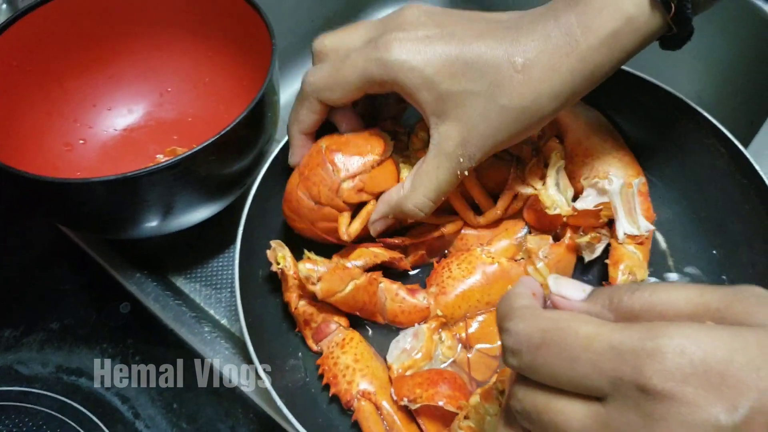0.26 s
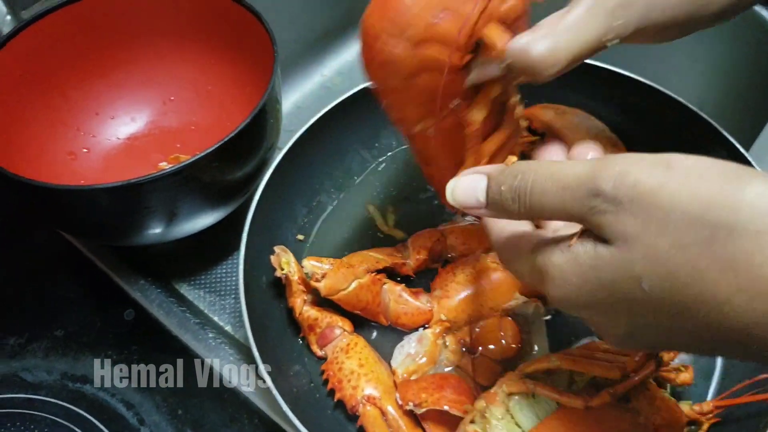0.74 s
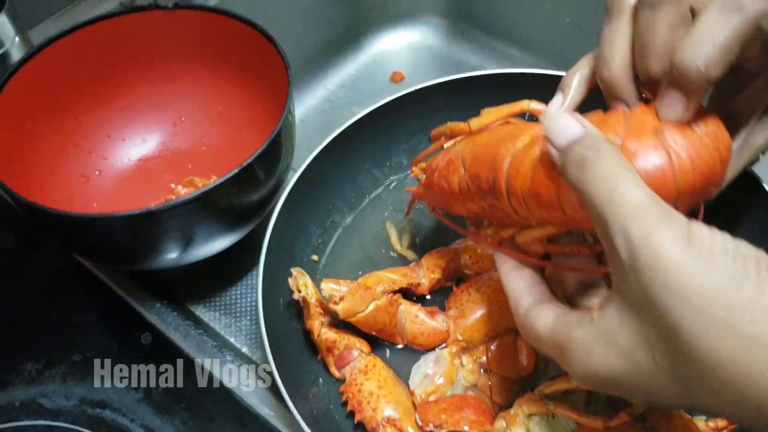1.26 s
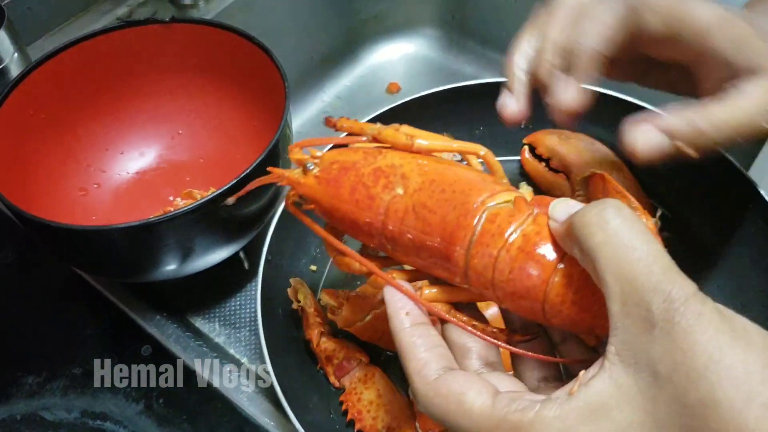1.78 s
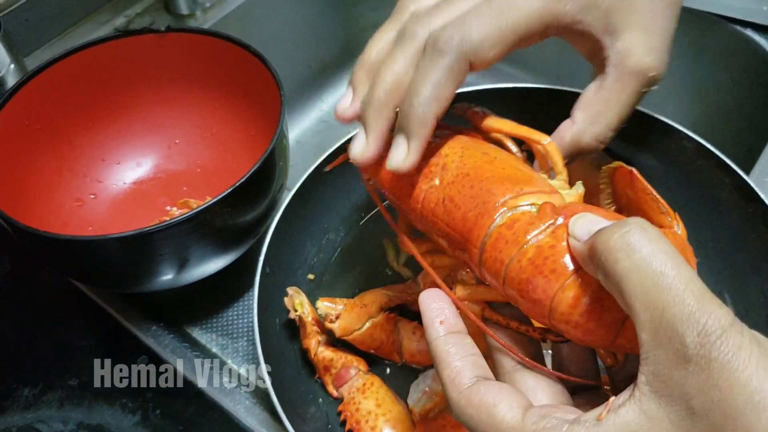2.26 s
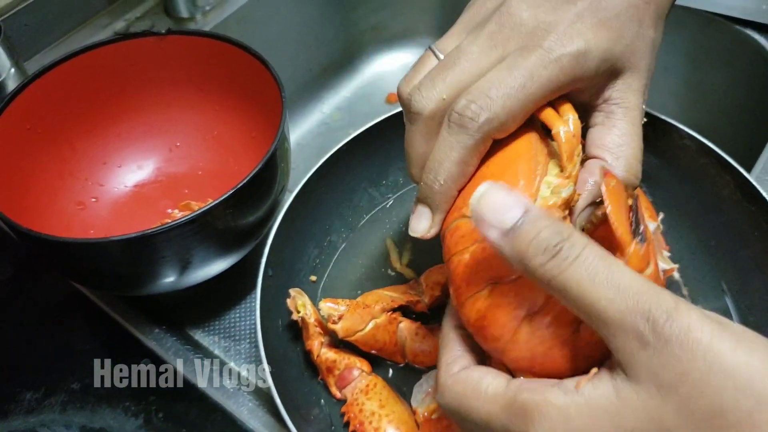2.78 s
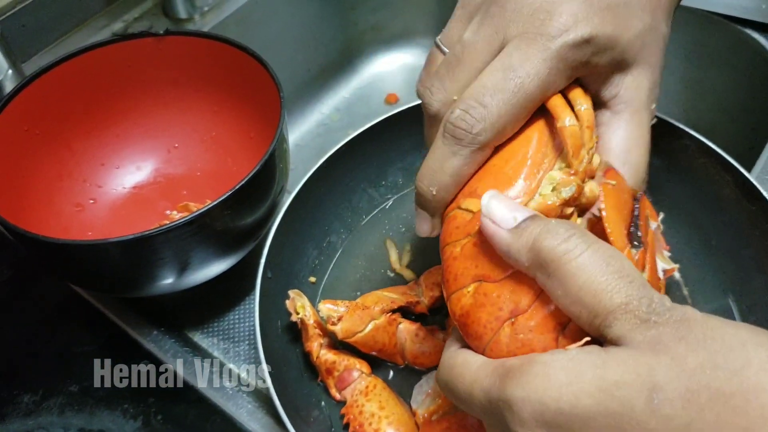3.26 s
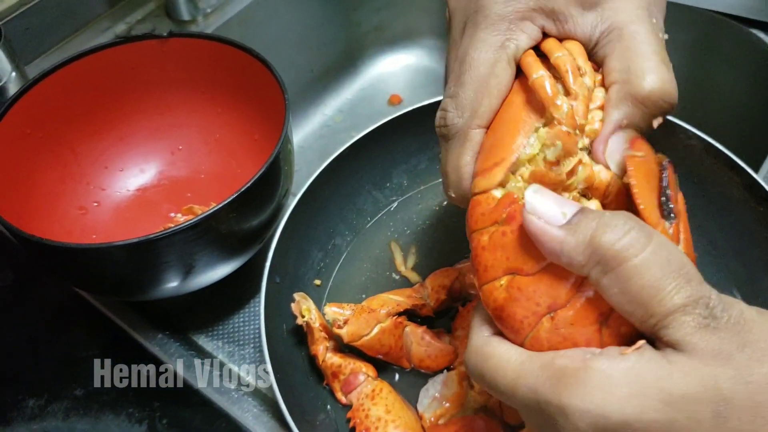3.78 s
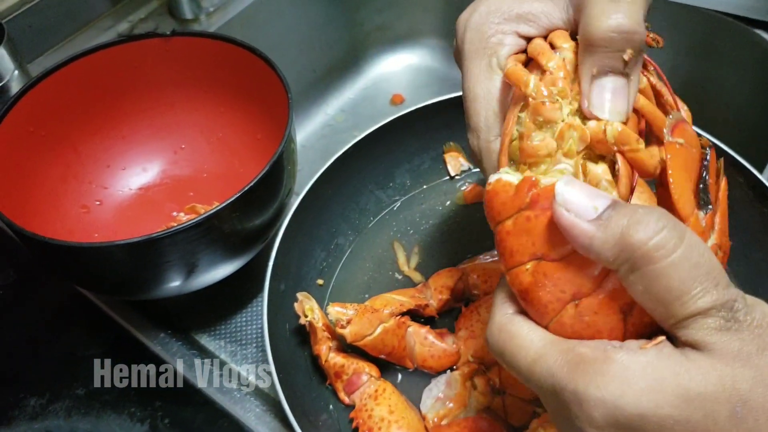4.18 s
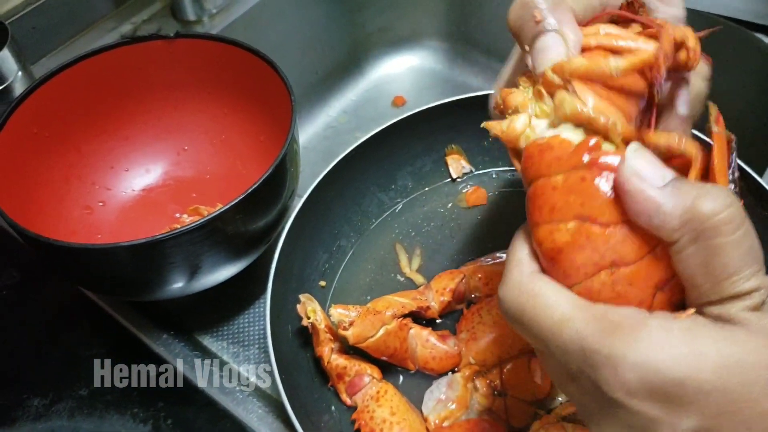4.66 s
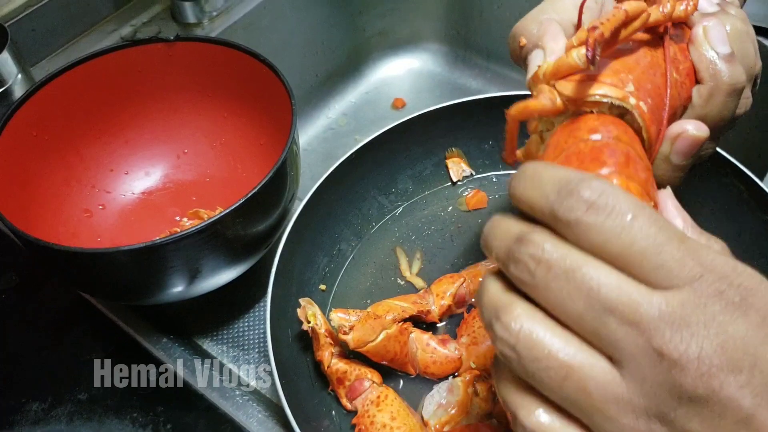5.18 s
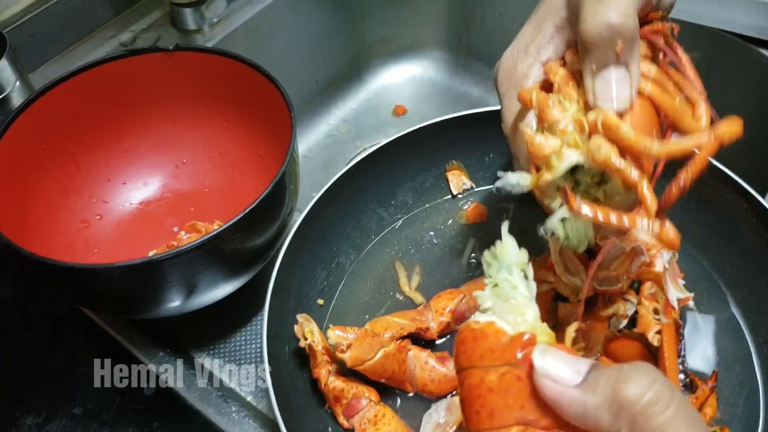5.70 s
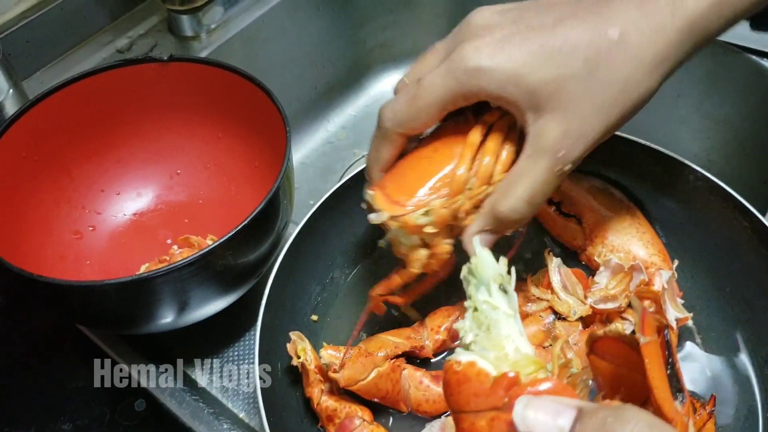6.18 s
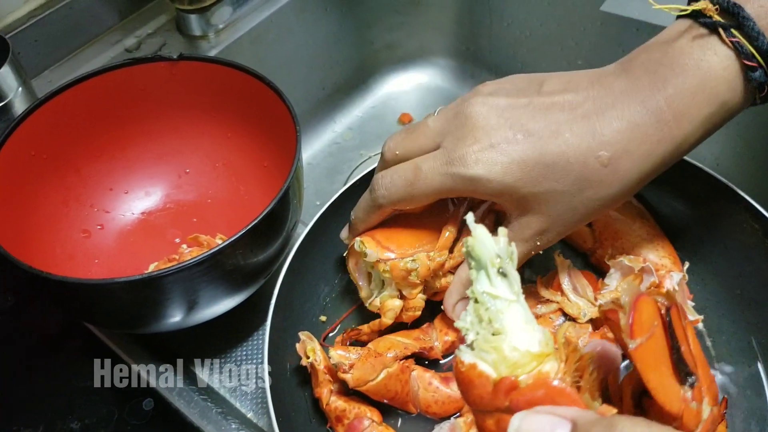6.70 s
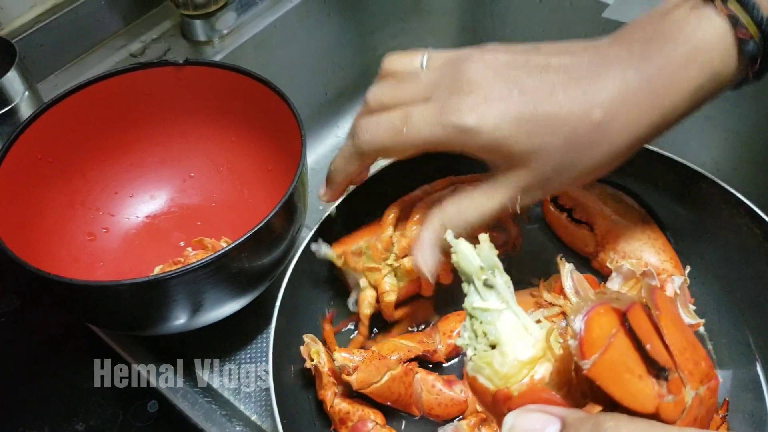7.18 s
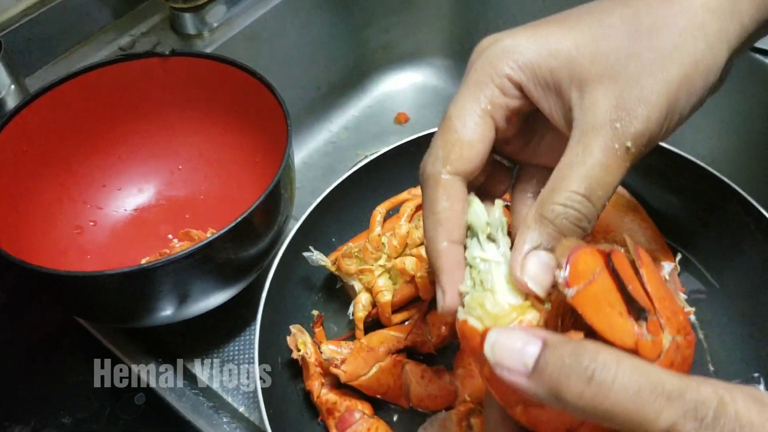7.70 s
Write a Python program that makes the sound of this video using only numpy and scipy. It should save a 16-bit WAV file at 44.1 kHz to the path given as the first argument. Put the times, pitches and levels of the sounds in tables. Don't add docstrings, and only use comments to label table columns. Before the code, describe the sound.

Brittle shell breaks in irregular bursts: a few hard cracks early, a near pause, then the heaviest crackling and snapping mid-way as the body is twisted apart. Fine wet rubbing and tiny chip pings fill in between. Late, the piece is laid down with a click and soft low thud. Short steel-basin ring, quiet appliance hum, faint camera lens whine, close microphone.

```python
import sys
import numpy as np
from scipy import signal
from scipy.io import wavfile
from scipy.ndimage import uniform_filter1d

SR = 44100
rng = np.random.default_rng(int(sys.argv[2]) if len(sys.argv) > 2 else 0)


def gain_from_db(level_db):
    decades = np.asarray(level_db, float) / 20
    return 10 ** decades


def dump(signal):
    limited = np.clip(np.atleast_2d(signal).T, -1, 1)
    pcm = np.round(limited * 32767).astype(np.int16)
    wavfile.write(sys.argv[1], SR, pcm)


N = 350154

# time in seconds, peak in dB, thickness as 1.2-3 kHz in dB re peak,
# sharp edge as the part over 9.5 kHz in dB re peak.
CLEAN_SNAPS = [(0.3329, -37, -10.5, -4), (0.7559, -48, 5, 2), (1.4514, -27, -45, -21.5),
               (3.0294, -67, -14, -11), (3.164, -39.5, -14, 9.5), (3.5922, -42, -26, -25),
               (3.685, -28, -7.5, -3), (3.7512, -48, -13, -22.5), (3.7586, -20.5, -9, -1.5),
               (3.9043, -59, -0.5, 5), (3.9216, -34, -7, 17), (4.0334, -45, -31, -15),
               (4.6401, -37, -14.5, 12), (5.5388, -48, -28, 5), (6.177, -56, -34, -25.5),
               (6.6639, -25.5, -8.5, 5)]
SPLITS = [(0.31, -41, -15, -1), (1.1417, -15.5, -25, -8), (1.3589, -41, -16, 8.5), (1.3656, -54, -14, 1),
          (1.4434, -27.5, -32, 16), (1.4734, -23, -58, -19), (1.544, -46.5, -4, -12),
          (3.0133, -46.5, -17, 10.5), (3.027, -40.5, -12, -1), (3.534, -49, -22, -19),
          (3.6277, -41, -17.5, -0.5), (3.841, -37.5, -13, 6), (3.8861, -17, -10.5, -0.5),
          (3.9152, -38.5, -21, 5.5), (4.007, -44, -48, -14), (4.1267, -76, 8, 34.5), (4.156, -39, -7.5, -2),
          (4.1669, -58.5, -32, 25), (4.193, -28, -18, 5), (4.459, -42.5, 2, 3), (4.48, -41, -4, 2),
          (4.7246, -33.5, -7.5, -16), (4.737, -36, -15, 6), (4.747, -36.5, -8, -22),
          (5.5528, -36, -12.5, 5.5), (5.647, -41, -37, -4), (5.689, -54, -23, -5), (6.232, -54, -28, 13.5)]
CRUNCHES = [(0.7926, -44.5, -17, -28), (0.8703, -46.5, -11, -3), (1.3723, -44, -19, -20),
            (1.4496, -21.5, -64, 2), (1.604, -61.5, -4, 3), (2.989, -60, -4, -6), (3.133, -62, -12, 17),
            (3.6034, -60, -17, -8), (4.0734, -62, -25, 16), (4.3807, -62, -17, 4), (4.6155, -54.5, -7, 3),
            (4.8358, -36.5, -12, 1), (4.8542, -36.5, -13.5, -19), (4.8924, -32, -15, 2),
            (5.04, -61, -2, -5), (5.146, -59, -27, -1), (5.382, -63, -14, -28), (5.595, -37, -7.5, 0),
            (5.6046, -64, -10, 1), (5.6237, -45.5, -27, 7), (5.6386, -42, -26, 3), (7.329, -31, -9.5, -0.5),
            (7.333, -57, -9, -6)]
KNOCKS = [(0.153, -46.5, -11, 10.5), (0.2746, -36.5, -7, -17), (0.611, -41.5, -11, -8),
          (1.5148, -35.5, -4, -11), (1.685, -61, -1, -15), (3.8937, -37.5, 1, 2), (3.9318, -25, -10, -7),
          (3.9581, -27, -10.5, 7), (4.254, -42.5, -4, -20), (4.3284, -25.5, -11.5, 3.5),
          (4.405, -27.5, -5.5, 1.5), (4.4162, -38.5, 7.5, -16.5)]
# hollow body in dB re peak, share of the thickness that the body follows,
# splintering in dB re peak.
FRACTURE_KINDS = [
    (-18.5, 0.34, -32),
    (-6.5, 0.96, -18),
    (-33, 0.23, -12.5),
    (-7.5, 0.35, -25.5),
]
# low edge in Hz, high edge in Hz, basin t60 in seconds.
SHELL_BANDS = [
    (228.5, 1180, 0.18),
    (1210, 3420, 0.14),
    (3780, 7590, 0.093),
    (9300, 19000, 0.067),
]
# time in seconds, peak in dB, pitch in Hz, # splintering in dB re peak.
CHIPS = [(0.19, -57, 13200, -14), (0.645, -58.5, 4450, -13), (0.667, -56, 4500, -12),
         (0.7558, -60, 1820, -16), (0.8711, -60, 1660, -36), (.683, -52, 4400, -14),
         (1.143, -26, 10900, -21), (1.148, -33, 11900, -24), (1.36, -38, 13500, -10.5),
         (6.664, -43.5, 9300, -12), (3.025, -55.5, 2480, -28), (3.357, -68, 13600, -12),
         (3.839, -53, 14900, -28), (3.896, -42.5, 2110, -27), (3.898, -51.5, 310, -24),
         (3.9305, -46, 930, -26), (3.9572, -48.5, 310, -5), (3.9574, -44.5, 910, -28),
         (3.958, -46, 1300, -31), (4.33, -51, 1140, -16), (4.335, -47, 2550, -18),
         (4.9544, -51.5, 5100, -3), (4.956, -49.5, 12400, -7), (5.0457, -68, 5300, -14),
         (5.0936, -68.5, 5200, -24), (7.23, -66.5, 1280, -17), (7.318, -54, 1250, -13),
         (7.345, -54.5, 1290, -12), (6.639, -59, 5520, -8), (3.894, -46, 13400, -32),
         (3.904, -35, 13000, -33.5), (3.9165, -28, 13740, -42), (3.9211, -22, 14130, -36),
         (4.408, -48.5, 1144, -15), (4.42, -51.5, 1190, -15), (4.465, -48, 6700, -29),
         (4.481, -49, 2360, -8), (4.732, -48, 2370, -5), (4.741, -40, 14600, -6), (4.856, -51, 4860, -5),
         (4.970, -47.5, 5230, -13.5), (5.553, -50.5, 3070, -10.5), (5.646, -48, 15300, -17),
         (5.939, -73, 4960, -5), (6.026, -48.5, 14100, -14), (6.113, -59.5, 13100, -13),
         (6.112, -49.5, 7100, -13), (6.237, -49, 9540, -6), (6.418, -55, 14600, -7)]
# start in seconds, length in seconds, level in dB, brightness in dB.
RUBS = [(0.0, 0.057, -52.5, 3.5), (.12, 0.075, -57, 2.5), (.22, 0.14, -57, 2.5), (.4, 0.31, -63.5, 7),
        (.665, 0.038, -49.5, 2), (.72, 0.19, -61, 5.5), (.85, 0.25, -69, 3.5), (1.48, 0.024, -63, 9),
        (1.58, 0.063, -68.5, 5), (1.96, 0.015, -64.5, 2.5), (2.05, 0.24, -72, 6), (2.8, 0.62, -76.5, 4),
        (3.17, 0.028, -65.5, 4), (3.31, .13, -71, 6), (3.51, 0.27, -67, 5.5), (3.72, 0.045, -52, 4.5),
        (3.98, 0.14, -61.5, 9), (4.18, 0.16, -60, 2), (4.36, 0.067, -52, 4.5), (4.52, 0.14, -67.5, 4.5),
        (4.7, 0.086, -53.5, 6.5), (4.8, 0.084, -52.5, 10), (4.93, 0.019, -46.5, 3), (5.03, 0.14, -68, 7.5),
        (5.2, 0.27, -74, 5), (5.56, 0.11, -58.5, 6), (5.7, 0.495, -73.5, 10.5), (6.3, 0.27, -77.5, 2.5),
        (6.635, 0.033, -54.5, 3.5), (6.72, 0.058, -77, 7), (7.05, 0.019, -64.5, 7.5), (7.23, 0.12, -53, -1)]

# time in seconds, peak in dB.
THUDS = [
    (0.597, -43),
    (0.61, -42.5),
    (1.989, -52),
    (2.744, -54),
    (2.78, -49.5),
    (6.666, -27.5),
    (7.085, -45),
    (7.236, -46),
    (7.252, -41.5),
    (7.376, -43),
]
# start in seconds, length in seconds, level in dB,
# grit as upper modes re lower in dB.
DRAGS = [(0.0, 0.099, -50.5, -11), (.12, 0.11, -42.5, -12), (.27, 0.1, -49.5, -3), (.42, 0.036, -60, -21),
         (.6, 0.0073, -64.5, 10.5), (.7, 0.11, -55.5, -8), (2.74, 0.12, -56, -20.5),
         (6.66, 0.032, -48.5, -3.5), (6.92, 0.023, -57, -12), (7.07, 0.033, -53.5, -11.5),
         (7.23, 0.05, -49.5, -11), (7.34, 0.032, -61.5, 9.5)]
# pitch in Hz, height in dB, t60 in seconds.
PAN_LOW = [(63, -3, 0.56), (89.9, -2.5, 0.386), (110.95, -4.5, 0.52), (145.6, 1.5, 0.135)]
PAN_HIGH = [(205, 7, 0.1), (234, 0.5, 0.064), (292, 5.5, 0.098), (466, -1, 0.12), (616, -5, 0.077)]

# speed curve of (seconds, whine in Hz), level in dB.
FOCUS_RUNS = [
    ([(-.3, 10500), (.02, 10350), (.045, 10050), (.075, 9300), (.09, 8580), (.115, 7950)], -60),
    ([(1.92, 8060), (1.96, 8900), (2.0, 9350), (2.05, 9700), (2.11, 10100), (2.14, 10450), (2.205, 11450), (2.285, 9850), (2.365, 8000)], -73),
    ([(6.38, 8060), (6.405, 8700), (6.46, 9700), (6.54, 10200), (6.575, 9850), (6.68, 9800), (6.72, 8800), (6.765, 7800)], -73),
]
# multiple of the whine, level in dB, engages in seconds after the start.
GEARS = [(1.0, 5, .16), (1.25, 0, .2), (1.42, 2, .13), (1.55, 3, 0.0)]

# pitch in Hz, density in dB per Hz.
ROOM_SPECTRUM = [(15, -54), (25, -14.5), (43, -9.5), (92, 1.5), (166, -25.5), (344, -22), (384, -21.5),
                 (531, -20.5), (962, -41), (1130, -49.5), (1370, -65.5), (1480, -37), (4250, -42),
                 (13600, -40.5), (16000, -57)]
# pitch in Hz, width in Hz, rms in dB, swell on the first and second beat in dB.
HUM = [(320.8, 63, -72, 3.5, 3), (533, 56, -75, 12.8, 9), (695, 600, -85.5, 4.8, 3),
       (1172, 180, -87.5, 1, 7), (2308, 250, -88.5, 3, 4.1)]
# pitch in Hz, left-right likeness.
LIKENESS = [(60, 1), (180, 0.77), (550, 0.43), (1650, -0.2), (4970, 0.1), (15000, -0.07)]
# pitch in Hz, left minus right in dB.
MIC_BALANCE = [(60, 5), (180, -7.5), (550, -1), (1650, 1), (4970, -1.5), (15000, -2.5)]
# start in seconds, end in seconds, kept below in Hz.
DULL_MOMENTS = [(1.130, 1.138, 60), (1.340, 1.347, 1200), (1.365, 1.370, 100), (1.433, 1.439, 60),
                (3.872, 3.880, 60), (4.151, 4.155, 4000), (4.174, 4.180, 1000), (4.312, 4.321, 800),
                (4.731, 4.734, 6500), (5.530, 5.534, 9000), (5.520, 5.528, 1200), (5.544, 5.549, 60),
                (6.101, 6.107, 900), (6.657, 6.661, 100), (6.012, 6.017, 2500), (7.320, 7.324, 3500)]

LEAD, BURST = 160, 2200


def rms_one(x):
    return x / np.sqrt(np.mean(x ** 2) + 1e-20)


def at_hz(points, hz):
    points_hz, values = np.transpose(points)
    return np.interp(np.log(hz), np.log(points_hz), values)


def band(x, low_hz, high_hz):
    return signal.sosfilt(signal.butter(2, [low_hz, high_hz], "band", fs=SR, output="sos"), x + 1e-18)


def drift(rate_hz):
    r = np.exp(-80 * np.pi * rate_hz / SR)
    slow = signal.lfilter([1], [1, -2 * r, r * r], rng.standard_normal(N // 40 + 2002))
    slow = rms_one(slow[2000:])
    return np.interp(np.arange(N) / 40, np.arange(len(slow)), slow)


def resonance(x, hz, width_hz):
    r = np.exp(-np.pi * width_hz / SR)
    poles = [1, -2 * r * np.cos(2 * np.pi * hz / SR), r * r]
    return signal.lfilter(np.array([1, 0, -1]) * (1 - r * r) / 2, poles, x)


def double_resonance(x, hz, width_hz):
    return resonance(resonance(x, hz, width_hz), hz, width_hz)


def strokes(rows, rise_db_s, fall_db_s, tilts):
    t, power = np.arange(0, N + 64, 64) / SR, 0
    for start, length, db, colour_db in rows:
        early, late = np.maximum(start - t, 0), np.maximum(t - start - length, 0)
        shape_db = db - rise_db_s * early - fall_db_s * late
        power = power + gain_from_db(shape_db + colour_db * np.array(tilts)[:, None]) ** 2
    return [np.interp(np.arange(N) / SR, t, np.sqrt(row)) for row in power]


def fractures(splinter_db):
    t, shape = (np.arange(BURST) - LEAD) / SR, (len(splinter_db), BURST)
    noise = rng.standard_normal(shape)
    click = noise * np.where(t < 0, gain_from_db(-38.0), gain_from_db(-60 * t / .001))
    clumps = gain_from_db(5.0 * rng.standard_normal((shape[0], BURST // 20))).repeat(20, axis=1)
    fade = np.clip(t / 0.00075, 0, 1) * gain_from_db(-60 * t / 0.038)
    return click, noise * clumps * fade * gain_from_db(splinter_db)[:, None]


def plate_colour(bursts, lags):
    earlier = np.maximum(np.arange(BURST) - lags[:, None], 0)
    return bursts + 0.51 * np.take_along_axis(bursts, earlier, axis=1)


def place(times, bursts):
    out = np.zeros(N + BURST)
    first = np.round(times * SR).astype(int)[:, None] - LEAD
    np.add.at(out, first + np.arange(BURST), bursts)
    return out[:N]


def snapping():
    kinds = [CLEAN_SNAPS, SPLITS, CRUNCHES, KNOCKS]
    s, peak_db, mid_db, edge_db = np.transpose(np.concatenate(kinds))
    hollow_db, follows, splinter_db = np.repeat(FRACTURE_KINDS, [len(rows) for rows in kinds], axis=0).T
    colour_db = [hollow_db + follows * mid_db, mid_db + 0.5, 2.5, edge_db + 0.5]
    lags = (rng.uniform(.0001, .0007, len(s)) * SR).astype(int)
    click, splinter = [plate_colour(part, lags) for part in fractures(splinter_db)]
    layers = []
    for (low_hz, high_hz, _), snap_db in zip(SHELL_BANDS, colour_db):
        height = np.abs(band(click, low_hz, high_hz)).max(axis=1)
        bursts = click / height[:, None] + splinter / np.median(height)
        snaps = band(place(s, gain_from_db(peak_db + snap_db)[:, None] * bursts), low_hz, high_hz)
        layers.append(band(snaps, low_hz * .8, high_hz * 1.05))
    return layers


def rubbing():
    low, mid, high = strokes(RUBS, 573, 241, [-1, 0, 1])
    gains = [low * gain_from_db(-5.5), low * gain_from_db(-9.5), mid * gain_from_db(-2.5), high * gain_from_db(-9.5)]
    grains = gain_from_db(4.5 * np.minimum(rng.exponential(1, N), 5)) * rng.choice([-1, 1], N)
    grains *= rng.random(N) < 4000 * gain_from_db(3.5 * drift(25)) / SR
    return [rms_one(band(grains, low_hz, high_hz)) * gain * gain_from_db(-4.0)
            for (low_hz, high_hz, _), gain in zip(SHELL_BANDS, gains)]


def chips():
    s, peak_db, pitch_hz, splinter_db = np.transpose(CHIPS)
    bursts = sum(fractures(splinter_db))
    pings = np.array([double_resonance(row, hz, 0.15 * hz + 120) for row, hz in zip(bursts, pitch_hz)])
    return place(s, (gain_from_db(peak_db + 10.5) / np.abs(pings).max(axis=1))[:, None] * pings)


def basin(x, t60, wet_db, kitchen_db, lag=1):
    t = np.arange(int(.45 * SR)) / SR
    clumps = gain_from_db(3.07 * rng.standard_normal((2, len(t) // 32 + 1))).repeat(32, axis=1)[:, :len(t)]
    echoes = rng.standard_normal((2, len(t))) * clumps
    fade = gain_from_db(-60 * t / t60) + gain_from_db(kitchen_db - 60 * t / 0.36)
    response = gain_from_db(wet_db) * echoes * fade * np.clip(t / 0.004, 0, 1)
    response[0, lag] += 1
    response[1, 0] += 1
    return signal.oaconvolve(x[None], response, axes=1)[:, :N]


def shell():
    out = basin(chips(), 0.082, -27.0, kitchen_db=-26.5)
    wets_db = [-27.0, -19.5, -23, -20.0]
    for (low_hz, _, t60), snaps, rubs, wet_db in zip(SHELL_BANDS, snapping(), rubbing(), wets_db):
        lag = 2 if low_hz < 5000 else 1
        out += basin(snaps + rubs, t60, wet_db, kitchen_db=-22, lag=lag)
    return out * gain_from_db([[-1.2], [1.2]])


def ring(x, modes):
    out = 0
    for hz, db, t60 in modes:
        r, w = gain_from_db(-60 / (t60 * SR)), 2 * np.pi * hz / SR
        out = out + signal.lfilter([0, gain_from_db(db) * np.sin(w)], [1, -2 * r * np.cos(w), r * r], x + 1e-18)
    return out


def pan():
    blows = np.zeros(N)
    for s, db in THUDS:
        blows[round(s * SR)] = gain_from_db(db)
    blows = np.convolve(blows, np.hanning(200) / 100)[:N]
    low, high = strokes(DRAGS, 483, 131.5, [0, 1])
    rough = rng.standard_normal(N) * gain_from_db(2.0 * drift(54))
    sound = gain_from_db(-7.5) * ring(blows, PAN_LOW) + gain_from_db(-16.0) * ring(blows, PAN_HIGH)
    sound += low * gain_from_db(-6.0) * rms_one(ring(rough, PAN_LOW[1:]))
    sound += high * gain_from_db(2.0) * rms_one(ring(rough, PAN_HIGH))
    return band(sound, 49, 1800) * gain_from_db([[0.8], [-0.8]])


def lens_motor():
    t, out = np.arange(N) / SR, 0
    flickers = [gain_from_db(4.5 * drift(16)) for _ in GEARS]
    hiss = gain_from_db(10) * rng.standard_normal(N)
    wobble = 1 + .004 * drift(150)
    for spin, db in FOCUS_RUNS:
        start, end = spin[0][0], spin[-1][0]
        turns = 2 * np.pi * np.cumsum(np.interp(t, *np.transpose(spin)) * wobble) / SR
        whine = 0
        for (multiple, gear_db, engage), flicker in zip(GEARS, flickers):
            engaged = np.clip((t - start - engage) / 0.017 + 1, 0, 1)
            whine = whine + gain_from_db(gear_db) * flicker * engaged * np.sin(multiple * turns)
        running = np.clip(np.minimum(t - start, end - t) / 0.014 + .5, 0, 1)
        out = out + gain_from_db(db) * running * (whine + hiss)
    return resonance(out, 13600, 2150) * gain_from_db([[-16], [0]])


def stereo_noise(white, hz):
    alike = np.clip(at_hz(LIKENESS, hz), -1, 1)
    pair = np.sqrt(1 + alike) * white[0] + np.sqrt(1 - alike) * white[1] * [[1], [-1]]
    return pair * gain_from_db(at_hz(MIC_BALANCE, hz) * np.array([[.5], [-.5]]))


def appliances():
    turn_s, beats_s, rise_s, fall_s = .24, np.array([.07, .21]), 0.014, .022
    since = (np.arange(N) / SR - beats_s[:, None] + turn_s / 2) % turn_s - turn_s / 2
    first, second = np.exp(-.5 * (since / np.where(since < 0, rise_s, fall_s)) ** 2)
    out = 0
    for hz, width_hz, db, first_db, second_db in HUM:
        narrow = double_resonance(rng.standard_normal((2, N)), hz, width_hz)
        level_db = db + first_db * first + second_db * second + 1.5 * drift(26.0)
        out = out + gain_from_db(level_db) * rms_one(stereo_noise(narrow, hz))
    return out


def room_tone():
    out, edges = 0, 22 * 2 ** np.arange(0, 9.6, .5)
    white = rng.standard_normal((2, 2, N))
    for k, (low, high) in enumerate(zip(edges, edges[1:])):
        hz = np.sqrt(low * high)
        patch_db = (2.0 if hz < 1500 else 0.4) * drift(13.5)
        out = out + gain_from_db(at_hz(ROOM_SPECTRUM, hz) + patch_db) * stereo_noise(band(white[k % 2], low, high), hz)
    return gain_from_db(-60.5) * rms_one(out)


def microphone(x):
    x = x - .82 * resonance(x, 8700, 2200)
    port = double_resonance(x, 13300, 6000)
    return x + (gain_from_db([[-3.5], [6.5]]) - 1) * port


def starve(x):
    out = x.copy()
    for start, end, keep_hz in DULL_MOMENTS:
        a, b = round(start * SR) - 2000, round(end * SR) + 2000
        kept = signal.sosfiltfilt(signal.butter(4, keep_hz, fs=SR, output="sos"), x[:, a:b])
        inside = uniform_filter1d(np.pad(np.ones(b - a - 4000), 2000), size=60)
        out[:, a:b] += inside * (kept - x[:, a:b])
    return out


def scene():
    return microphone(shell()) + pan() + lens_motor() + appliances() + room_tone()


def low_pass(x):
    return signal.sosfilt(signal.butter(12, 16810, fs=SR, output="sos"), x)


def record(dry):
    cut = signal.sosfilt(signal.ellip(8, .5, 40, 15850, fs=SR, output="sos"), dry)
    return low_pass(starve(cut))


dry = scene()
out = record(dry)
dump(out)
```